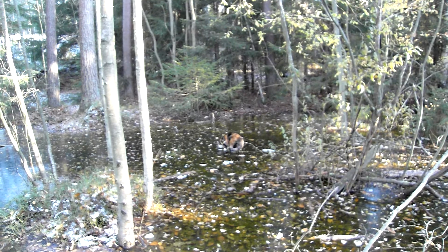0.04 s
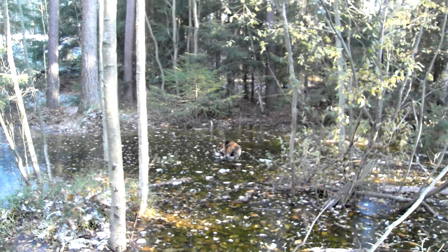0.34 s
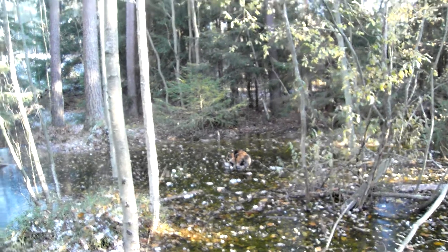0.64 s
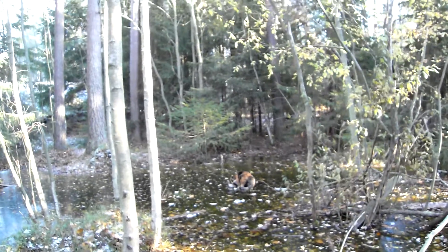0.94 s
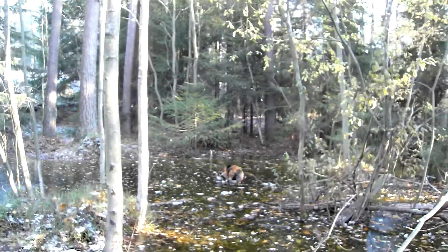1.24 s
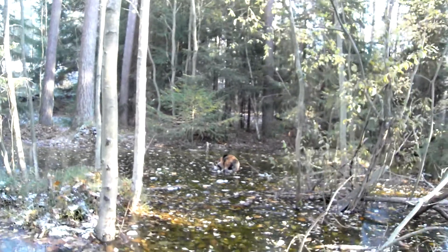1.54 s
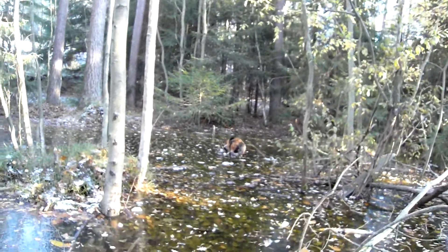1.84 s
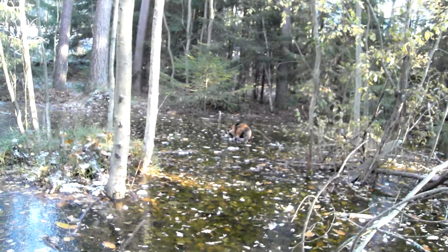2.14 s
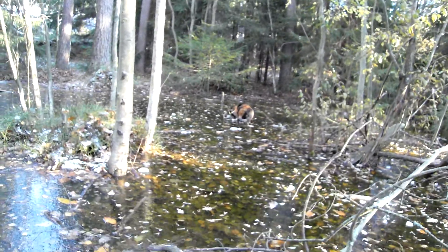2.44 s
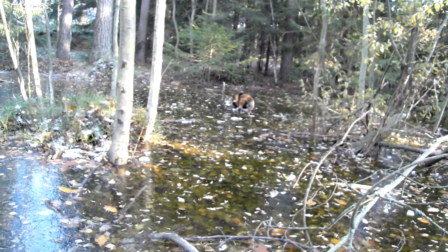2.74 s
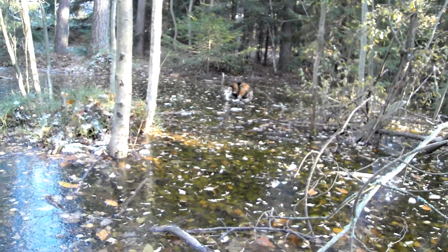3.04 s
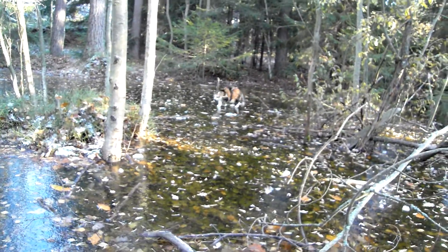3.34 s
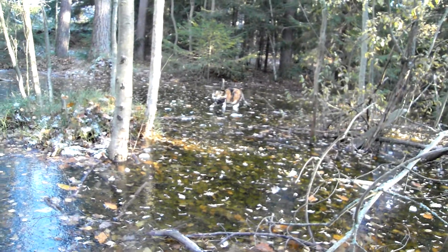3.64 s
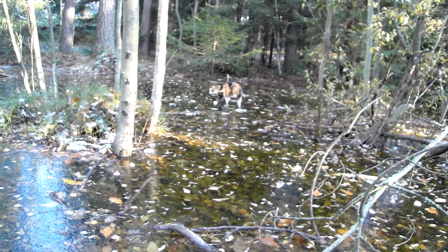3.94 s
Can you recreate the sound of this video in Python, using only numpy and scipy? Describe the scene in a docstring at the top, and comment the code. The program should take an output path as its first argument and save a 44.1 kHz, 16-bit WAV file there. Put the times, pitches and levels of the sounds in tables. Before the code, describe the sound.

Something like thin ice creaks and cracks sharply after soft handling noises outdoors.

```python
"""A finger brushes the left microphone over the low, steady air of a frozen forest pond.
A sleeve rustles close by, with soft knocks and dry taps of the hand, and a small bird whistles twice
from the trees. Then something brittle right by the microphones, thin ice or hard plastic, sticks and
slips in a rough creak, ticks and cracks sharply; every slip and snap rings the same surface."""
import sys
import numpy as np
from scipy import signal
from scipy.fft import rfft, irfft
from scipy.io import wavfile
from scipy.ndimage import uniform_filter1d

SR = 44100
rng = np.random.default_rng(int(sys.argv[2]) if len(sys.argv) > 2 else 0)


def master(y):
    """Save y as 16-bit WAV."""
    cut = np.clip(np.atleast_2d(y).T, -1, 1)
    pcm = np.round(cut * 32767)  # scale
    wavfile.write(sys.argv[1], SR, pcm.astype(np.int16))


N = 176400

# Ring of the brittle surface. Each row: frequency in Hz, relative level in dB, 60 dB decay in seconds.
SURFACE_MODES = [(1230, 0, 0.0016), (2636, -2.5, 0.0072), (2880, -.5, 0.0086), (3760, 4.5, 0.0045),
                 (4700, -8.5, 0.0071), (5550, 2.5, 0.0043), (6230, -3.5, 0.0037), (7450, -9, 0.0067),
                 (8480, -3.5, 0.005), (10220, -3.5, 0.002), (11400, -5.5, 0.0042)]
# Its deep flexing as it gives way. Each row: frequency in Hz, level in dB, 60 dB decay in seconds.
FLEX_MODES = [(247, -31, 0.083), (347, -7, 0.0065), (1125, -7.5, 0.0089)]
# Course of the creak. Each row: time in seconds, drive in dB.
CREAK_LEVEL = [(2.26, -60), (2.28, -44.5), (2.325, -42), (2.345, -50), (2.44, -52), (2.456, -40.5),
               (2.49, -44), (2.6, -44), (2.62, -53), (2.74, -49.5), (2.86, -59), (2.95, -55), (3.04, -58),
               (3.12, -52), (3.25, -61)]
# Splintering around the crack. Each row: time in seconds, drive in dB.
SPLINTER_LEVEL = [(2.952, -51), (2.962, -40), (2.981, -40), (2.986, -34), (2.993, -28), (3.0, -36),
                  (3.025, -53), (3.05, -70)]
# Small snaps. Each row: start in seconds, relative drive in dB, treble tilt in dB per octave.
SURFACE_SNAPS = [(2.109, -35.5, 1), (2.355, -27.5, -6), (2.453, -27, -6), (2.519, -27, -1),
                 (2.585, -24, -6), (2.602, -28, -6), (2.667, -33, 3), (2.72, -19, -4), (2.745, -32, 3),
                 (2.772, -21.5, 2), (3.0163, -21, -2), (3.079, -27, -6)]
# Colour of the crack. Each row: frequency in Hz, relative level in dB.
CRACK_SPECTRUM = [(700, -11), (1200, -2), (1650, -12), (2200, 0), (3100, 0), (3800, -10), (4800, 0),
                  (6500, -1.5), (8200, 5.5), (10000, -5.5)]
# Soft knocks of the hand. Each row: start in seconds, level in dB, pitch in Hz.
HAND_KNOCKS = [(.741, -31.5, 480), (.884, -31, 450), (.947, -32, 420), (1.012, -29.5, 590),
               (1.029, -28, 596), (1.122, -29.5, 744), (1.201, -31.5, 650)]
# Dry taps. Each row: start in seconds, left peak in dB, centre in Hz, width in octaves,
# left minus right in dB.
HAND_TAPS = [(0.1407, -24, 2000, 1.1, 20), (0.1429, -17, 470, 0.65, 39), (0.1434, -15.5, 4150, 0.17, 27),
             (.1498, -19.5, 4500, 0.28, 22), (0.726, -31, 4400, 0.24, 11), (1.0675, -20.7, 1110, 0.55, 1),
             (1.0677, -32, 4000, .3, 1), (1.0714, -30, 1700, .65, 1), (1.218, -28.5, 1700, .7, 2)]
# Course of the sleeve's rustle. Each row: time in seconds, level in dB.
SLEEVE_LEVEL = [(.15, -56), (.55, -49), (1.02, -48.5), (1.35, -52), (1.55, -59), (2.1, -65)]
# Colour of the cloth. Each row: frequency in Hz, relative level in dB.
SLEEVE_SPECTRUM = [(120, -20), (280, -12), (550, 0.5), (1500, -4.5), (4500, -12), (11000, -15.5)]
# Course of the finger's brush. Each row: time in seconds, level before panning in dB.
FINGER_LEVEL = [(0, -60), (.025, -55), (.15, -54), (.26, -70)]
# Colour of skin on the microphone. Each row: frequency in Hz, relative level in dB.
FINGER_SPECTRUM = [(300, -15), (700, 5), (1500, -4.5), (2700, -5), (3500, 1), (4700, 2.5), (7000, -3.5),
                   (11000, -17.5)]
# Bird calls. Each row: start in seconds, length in seconds, relative level in dB, starting pitch in Hz.
BIRD_CALLS = [(1.748, .19, -55, 3560), (2.1, .11, -58, 3620)]
# Colour of the forest air. Each row: frequency in Hz, relative level in dB.
AIR_SPECTRUM = [(20, -14), (55, -2.5), (130, -4), (230, -.5), (450, -4), (1100, -8.7), (1700, -15),
                (3500, -18.5), (11400, -23.5)]
# How alike the air is at the two microphones. Each row: frequency in Hz, likeness from 0 to 1.
AIR_LIKENESS = [(100, 0.94), (1200, 0.84), (4000, 0.23)]
# Far rumble. Each row: centre in Hz, width in Hz, level in dB.
RUMBLE_BANDS = [(97.9, 10, -68)]

CRACK_S, FRACTURE_LIKENESS = 2.9828, 0.6
HIT_SAMPLES = 2048
HIT_T, HIT_HZ = np.arange(HIT_SAMPLES) / SR, np.fft.rfftfreq(HIT_SAMPLES, 1 / SR)


def brittle_surface():
    """Close by, a little left: slips and fractures ring one surface, which flexes as it cracks."""
    modes = np.array([decay(db, t60) * np.cos(2 * np.pi * hz * HIT_T) for hz, db, t60 in SURFACE_MODES])
    modes /= np.linalg.norm(modes)
    out = creak(modes) + convolve(splinters() + snaps() + crack(), modes.sum(0))
    out = highpass(out * pan(left_db=5), hz=600, order=2)
    flex = sum(decay(db, t60) * np.sin(2 * np.pi * hz * HIT_T) for hz, db, t60 in FLEX_MODES)
    add(out, CRACK_S + 0.00065, flex * pan(left_db=1))
    out = highpass(out, hz=190, order=4)
    return out + amp(-23) * forest_echoes(out, t60=0.73)


def creak(modes, grip_db=2.2, attack_s=0.00036):
    """Stick-slip rings the surface; the contact shifts, so each mode swells and fades by itself."""
    drive = level(CREAK_LEVEL) * unit(slips(per_s=4000, spread_db=2)[0])
    out = np.zeros((2, N))
    for mode in modes:
        scatter = stereo(rng.standard_normal((2, N)), likeness=0.54)
        ring = mode * (1 - np.exp(-HIT_T / attack_s))
        ring *= np.linalg.norm(mode) / np.linalg.norm(ring)
        grip = amp(grip_db * wander(N, smooth_samples=500) - grip_db / 2)
        out += convolve(grip * drive * scatter, ring)
    return out


def crack(second_break_s=0.001081, second_break_db=-4.5):
    """The surface breaks twice in quick succession, heard as one sharp crack."""
    fracture = burst(0.00045, FRACTURE_LIKENESS)
    snap = 2 * amp(0.5) * convolve(fracture, click(read(CRACK_SPECTRUM, HIT_HZ)))
    drive = np.zeros((2, N))
    add(drive, CRACK_S, snap)
    add(drive, CRACK_S + second_break_s, amp(second_break_db) * snap)
    return drive


def snaps():
    """Single ticks, too small to move the lowest mode much."""
    octaves = np.log2(np.maximum(HIT_HZ, 2500) / 4500)
    thin_db = read([(1400, -13), (2500, 0)], HIT_HZ)
    drive = np.zeros((2, N))
    for start, db, tilt_db in SURFACE_SNAPS:
        snap = convolve(burst(0.0007, FRACTURE_LIKENESS), click(thin_db + tilt_db * octaves))
        add(drive, start, 2 * amp(db) * snap)
    return drive


def splinters():
    """A spray of tiny fractures with a flat spectrum, just before and after the crack."""
    grains = slips(per_s=10000, spread_db=2.5)
    return level(SPLINTER_LEVEL) * coloured(grains, [(1, 0)], FRACTURE_LIKENESS)


def hand(skirt_db=12.5):
    """The hand knocks and taps the camera that carries the microphones: damped tones and dry clicks."""
    out = np.zeros((2, N))
    for start, db, hz in HAND_KNOCKS:
        add(out, start, decay(db, t60=0.0095) * np.sin(2 * np.pi * hz * HIT_T))
    for start, db, centre, octaves, left_db in HAND_TAPS:
        off_centre = np.log2((HIT_HZ + 1) / centre) / octaves
        band_db = -skirt_db * np.log1p(off_centre ** 2 / 2)
        tap = convolve(burst(0.00057, likeness=0.86), click(band_db))
        add(out, start, amp(db) * tap / abs(tap).max() * amp([[0], [-left_db]]))
    return out + amp(-17) * forest_echoes(out, t60=0.086)


def sleeve():
    """Cloth rubs in fine grains close to the microphones."""
    rustle = coloured(slips(per_s=9000, spread_db=1), SLEEVE_SPECTRUM, likeness=0.62)
    return level(SLEEVE_LEVEL) * rustle * pan(left_db=2)


def finger():
    """Skin rubs in rougher grains right on the left microphone."""
    brush = coloured(slips(per_s=9000, spread_db=3), FINGER_SPECTRUM, likeness=0.71)
    return level(FINGER_LEVEL) * brush * pan(left_db=16)


def bird(top_hz=4140, rise_s=0.045, waver=0.0092, attack_s=0.017):
    """Off in the trees, thin whistles rise and level off, smeared by echoes from the trunks."""
    out, t = np.zeros((2, N)), np.arange(SR // 2) / SR
    for start, length, db, from_hz in BIRD_CALLS:
        hz = top_hz + (from_hz - top_hz) * np.exp(-t / rise_s)
        hz *= 1 + waver * wander(len(t), smooth_samples=200)
        shape = np.clip(t / attack_s, 0, 1) * np.clip(2 * (length - t) / length, 0, 1)
        add(out, start, shape * amp(db) * np.sin(2 * np.pi * np.cumsum(hz) / SR))
    return 0.3 * out + forest_echoes(out, t60=0.6)


def forest_air(patch_db=0.61):
    """Distant forest noise with faint drifting patches, over a narrow far rumble."""
    hz = np.fft.rfftfreq(N, 1 / SR)
    frames = signal.stft(rng.standard_normal((2, N)), nperseg=512)[2]
    patches = uniform_filter1d(rng.standard_normal(frames.shape[1:]), size=8, axis=0)
    patches = unit(uniform_filter1d(patches, size=14, axis=1))
    noise = signal.istft(frames * amp(patch_db * patches), nperseg=512)[1][:, :N]
    out = amp(-50.5) * coloured(noise, AIR_SPECTRUM, read(AIR_LIKENESS, hz))
    for centre, width, db in RUMBLE_BANDS:
        band = rfft(rng.standard_normal(N)) / (1 + (2 * (hz - centre) / width) ** 2)
        out += amp(db) * unit(irfft(band, N))
    return out * pan(left_db=0.76)


def forest_echoes(x, t60, per_s=4000):
    """Sparse echoes from the ground and the trees, falling 60 dB in t60 seconds."""
    t = np.arange(SR) / SR
    signs = np.sign(rng.standard_normal((2, SR)))
    echoes = signs * (rng.random((2, SR)) < per_s / SR) * amp(-60 * t / t60)
    return signal.fftconvolve(x, echoes / np.linalg.norm(echoes[0]), axes=1)[:, :N]


def slips(per_s, spread_db):
    """Two trains of tiny slips at the same random moments, a few of them large."""
    size = amp(spread_db * np.minimum(rng.exponential(1, N), 4))
    return size * (rng.random(N) < per_s / SR) * rng.standard_normal((2, N))


def burst(length_s, likeness):
    """A short cluster of fractures with an even spectrum, in two channels."""
    x = stereo(rng.standard_normal((2, HIT_SAMPLES)), likeness)
    window = np.exp(-HIT_T / length_s)
    for _ in range(4):  # shorten, then flatten the spectrum
        spectrum = rfft(x * window)
        x = irfft(spectrum / (abs(spectrum) + 1e-12))
        window = HIT_T < 3 * length_s
    return x


def click(gain_db):
    """The tightest click with a given spectrum (minimum phase)."""
    cepstrum = irfft(np.log(amp(np.maximum(gain_db, -100))))
    half = len(cepstrum) // 2
    folded = np.r_[cepstrum[0], 2 * cepstrum[1:half], np.zeros(half)]
    return irfft(np.exp(rfft(folded)))


def coloured(pair, spectrum, likeness):
    """Gives two unrelated signals a spectrum and a left-right likeness, at rms 1."""
    gain = amp(read(spectrum, np.fft.rfftfreq(N, 1 / SR)))
    return unit(irfft(stereo(rfft(pair), likeness) * gain, N))


def stereo(pair, likeness):
    """Blends two unrelated signals into partly alike left and right channels."""
    left, other = pair
    return np.array([left, likeness * left + np.sqrt(1 - likeness ** 2) * other])


def wander(samples, smooth_samples):
    """Smooth random drift at rms 1."""
    return unit(uniform_filter1d(rng.standard_normal(samples), size=smooth_samples))


def decay(db, t60):
    """Envelope of a ring that falls 60 dB in t60 seconds."""
    return amp(db - 60 * HIT_T / t60)


def convolve(x, response):
    """Passes both channels through one impulse response."""
    return signal.oaconvolve(x, response[None], axes=1)[:, :N]


def highpass(x, hz, order):
    """Rolls off the bass."""
    return signal.sosfilt(signal.butter(order, hz, "high", fs=SR, output="sos"), x)


def amp(db):
    """Decibels to gain."""
    return 10 ** (np.asarray(db) / 20)


def unit(x):
    """Scales to rms 1."""
    return x / np.sqrt(np.mean(x ** 2) + 1e-20)


def read(points, hz):
    """Reads a table on a log-frequency axis."""
    point_hz, value = np.transpose(points)
    return np.interp(np.log(hz + 1), np.log(point_hz + 1), value)


def level(points):
    """Gain over time from a level curve, silent outside it."""
    seconds, db = np.transpose(points)
    return amp(np.interp(np.arange(N) / SR, seconds, db, left=-np.inf, right=-np.inf))


def pan(left_db):
    """Channel gains with the left louder by left_db."""
    return amp([[left_db / 2], [-left_db / 2]])


def add(mix, start_s, sound):
    """Mixes a sound in at a time."""
    part = mix[:, max(round(start_s * SR), 0):][:, :sound.shape[-1]]
    part += sound[..., :part.shape[1]]


def scene():
    """The pond as it reaches the two microphones."""
    return forest_air() + hand() + sleeve() + finger() + bird() + brittle_surface()


def record(dry):
    """Peaks clip at the overload ceiling, then the treble is cut above 11.5 kHz."""
    lowpass = signal.firwin(1001, 11500, window=("kaiser", 8), fs=SR)
    return signal.oaconvolve(np.clip(dry, -0.72, 0.72), lowpass[None], "same")


dry = scene()
out = record(dry)
master(out)
```